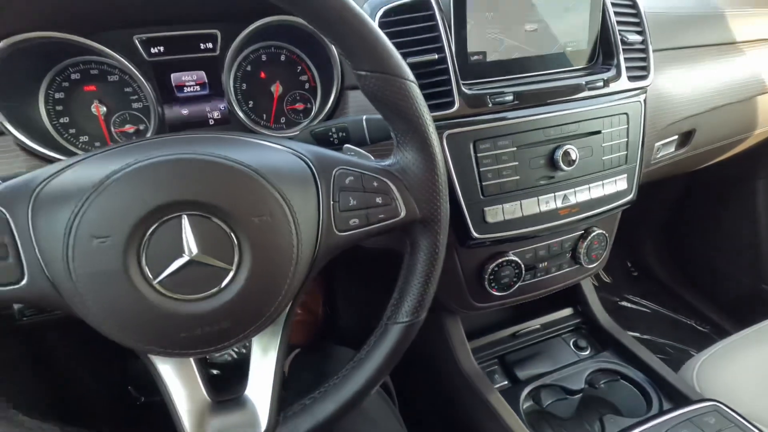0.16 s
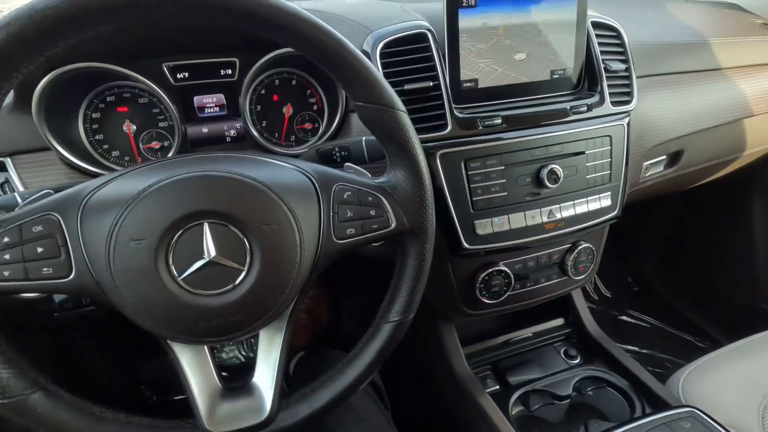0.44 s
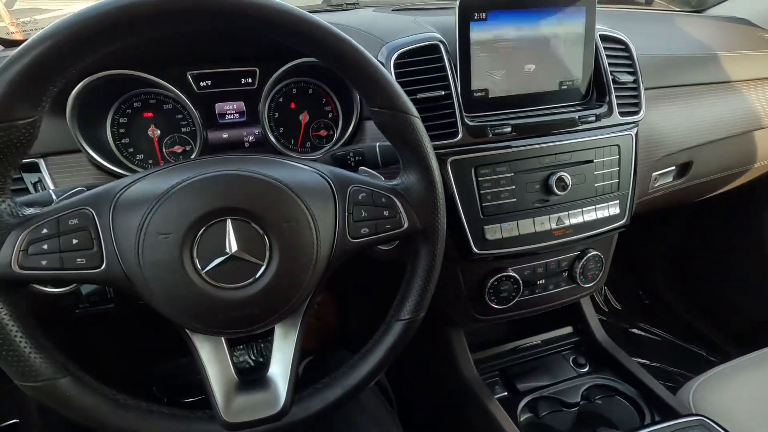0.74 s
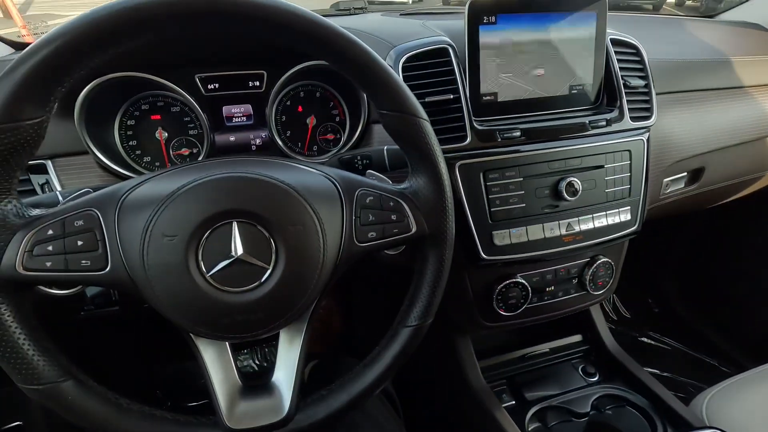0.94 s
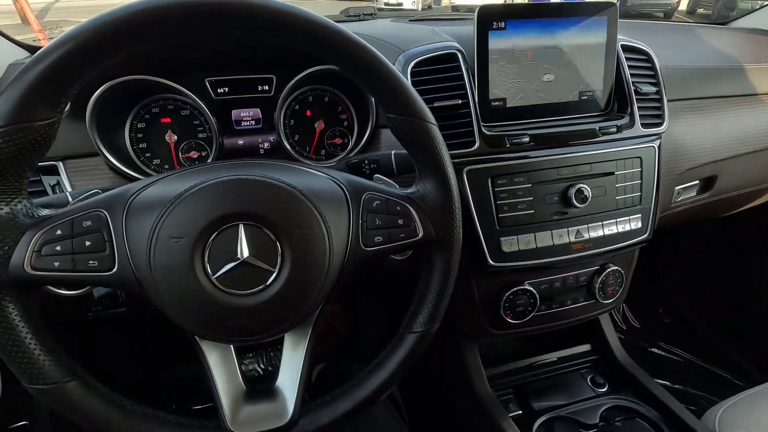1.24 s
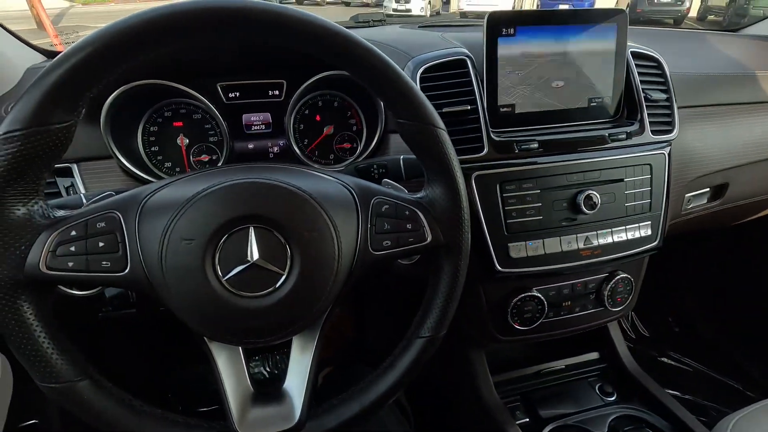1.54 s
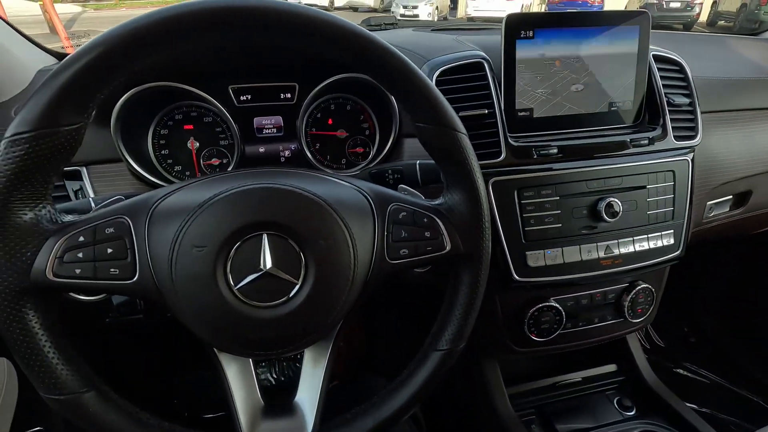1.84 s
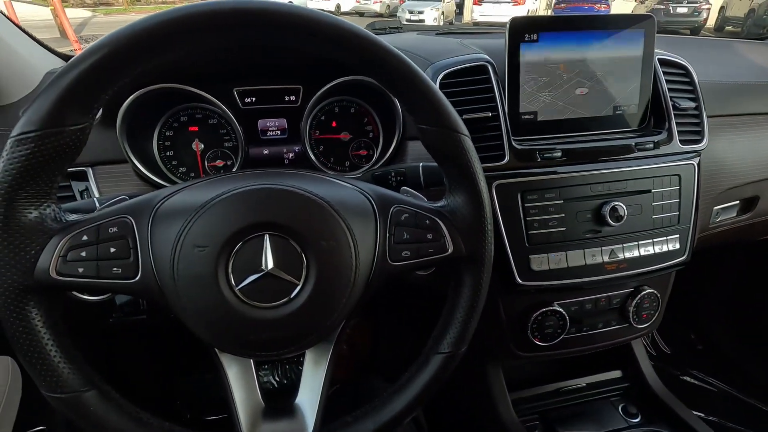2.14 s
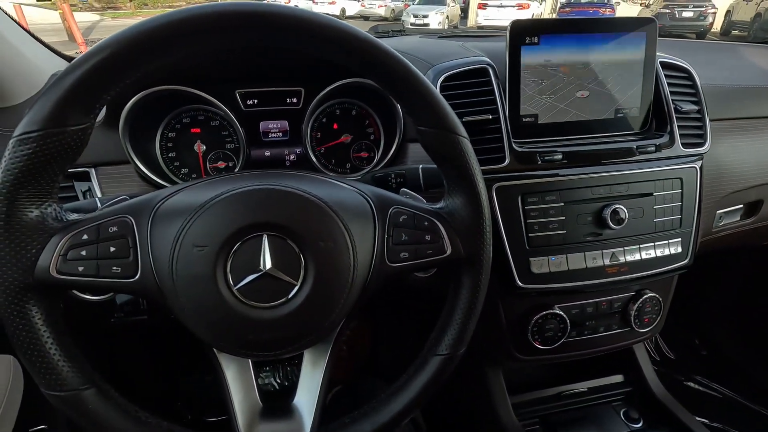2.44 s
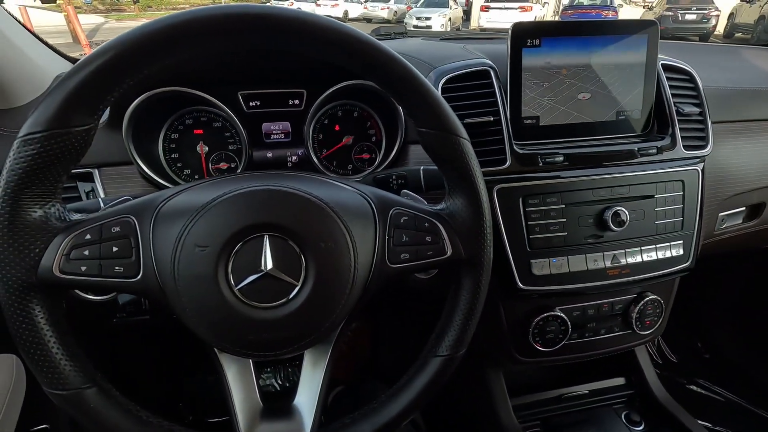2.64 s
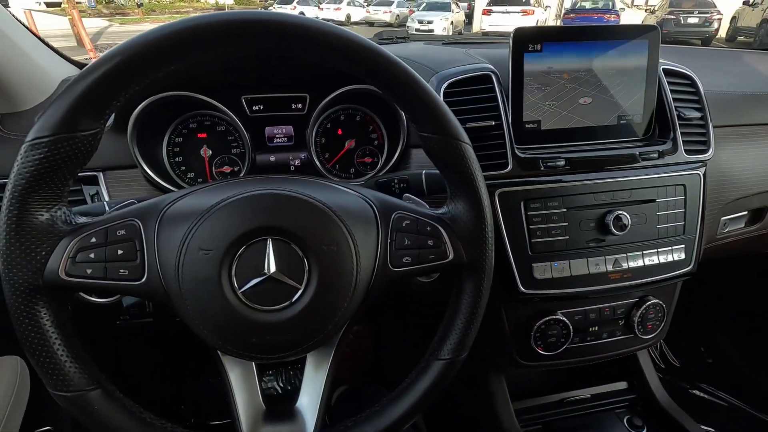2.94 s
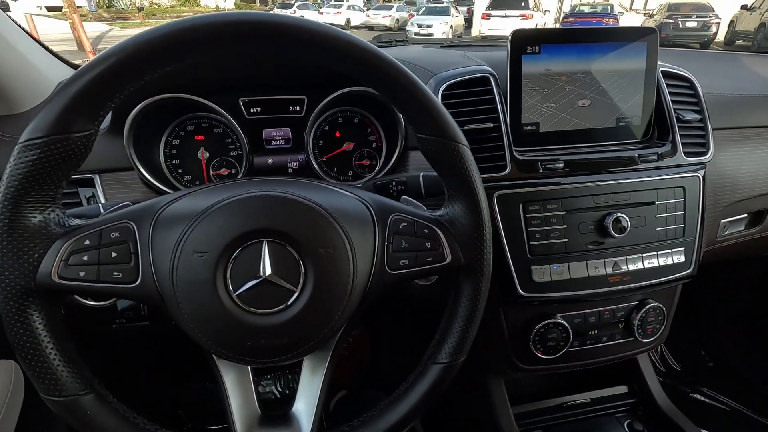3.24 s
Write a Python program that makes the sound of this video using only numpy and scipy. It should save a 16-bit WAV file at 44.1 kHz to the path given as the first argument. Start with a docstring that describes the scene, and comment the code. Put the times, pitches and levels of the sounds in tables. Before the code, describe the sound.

From the driver's seat, close microphone: low smooth engine idle, several small plastic clicks and faint rustling, then a quick throaty rev, a sinking hum and a second rev starting as it cuts off.

```python
"""Revving a parked six-cylinder

From the driver's seat, a petrol engine idles, is revved, sinks and is revved again.
Sines at multiples of the shaft speed boom in the closed cabin, over low noise.
The intake roars with noise and a gliding comb of half orders; brighter noise is valve and belt whirr.
Close by, plastic clicks (noise snaps and decaying sines) over a soft rustling hiss.
Car-body resonances, as wandering sines, swell as the revs rise and sink."""
import sys
import numpy as np
from scipy.fft import rfft, irfft, next_fast_len
from scipy.io import wavfile
from scipy.ndimage import map_coordinates

SR = 44100
rng = np.random.default_rng(int(sys.argv[2]) if len(sys.argv) > 2 else 0)


def unload_wav(signal):
    """Save mono or channel-first audio to the path in sys.argv[1] as 16-bit WAV at rate SR, clipped to [-1, 1]."""
    wavfile.write(
        sys.argv[1],
        SR,
        np.round(np.clip(np.atleast_2d(signal).T, -1, 1) * 32767).astype(np.int16),
    )


N = 149940  # samples, 3.4 s


def amp(db):
    """Decibels to a linear gain."""
    return 10 ** (np.asarray(db) / 20)


def unit(x):
    """x scaled to rms 1."""
    return x / np.sqrt(np.mean(x ** 2) + 1e-20)


def along(points, hz):
    """Read (frequency, value) points on a log-frequency axis."""
    f, v = np.transpose(points)
    return np.interp(np.log(hz + 1), np.log(f + 1), v)


def curve(rows, column=1):
    """One column of a timed table, one value per sample."""
    columns = np.transpose(rows)
    return np.interp(np.arange(N) / SR, columns[0], columns[column])


def wobble(rate):
    """A smooth random curve, rate knots a second."""
    knots = rng.standard_normal(int(N * rate / SR) + 4)
    return map_coordinates(knots, [np.arange(N) * rate / SR])


def filtered(x, response):
    """x with its spectrum multiplied by a response of frequency."""
    n = x.shape[-1]
    m = next_fast_len(n + 8192)
    spectrum = rfft(x, m) * response(np.fft.rfftfreq(m, 1 / SR))
    return irfft(spectrum, m)[..., :n]


def pan(db):
    """Left and right gains for a left-minus-right level."""
    return amp(np.array([[.5], [-.5]]) * db)


def cycles(hz):
    """Running count of cycles of a gliding frequency."""
    return np.cumsum(hz) / SR


# stereo width of the noises: (frequency [Hz], left-right likeness [0-1])
ALIKE = [(30, .98), (130, .9), (250, .5), (500, .3), (1000, .33), (4000, .35), (10000, .6)]


def noise(colour, size=N):
    """Coloured stereo noise of rms 1, nearly mono in the bass: a shared mid plus an opposed side."""
    turn = lambda hz: np.arccos(np.clip(along(ALIKE, hz), -1, 1)) / 2
    shape = lambda hz: amp(along(colour, hz)) * [np.cos(turn(hz)), np.sin(turn(hz))]
    mid, side = filtered(rng.standard_normal((2, size)), shape)
    return unit(np.array([mid + side, mid - side]))


def band(centre_hz, octaves):
    """Stereo noise of rms 1 in a bell-shaped band."""
    bell = lambda hz: np.exp(-.5 * (np.log2((hz + 1) / centre_hz) / octaves) ** 2)
    return unit(filtered(rng.standard_normal((2, N)), bell))


FIRINGS_PER_TURN = 3
FIRING_DB, FIRING_UNSTEADY_DB = 3.5, 1  # lift and flutter of the firing note
ORDER_JITTER = .012  # turns of phase wander per dB of unsteadiness
# engine load: (time [s], load [dB])
LOAD = [(0, -10), (1.1, -5.5), (1.28, -5.5), (1.44, -7), (1.65, 7), (1.86, -1.5), (2.0, -3), (2.2, -10.5),
        (2.5, -14.5), (2.8, -10), (2.95, -7.5), (3.25, 4.5), (3.4, 0)]
# the revs: (time [s], firing rate [per second], firing-note level before its lift [dB])
REVS = [(0, 29.2, -32.5), (1.1, 30.7, -31.5), (1.22, 37.2, -27), (1.3, 38.6, -24.5), (1.36, 50, -26.5),
        (1.44, 66, -19.5), (1.51, 75.7, -38.5), (1.624, 104, -28), (1.73, 126.6, -32), (1.82, 149.5, -31.5),
        (1.904, 154, -30), (2.02, 148.6, -27), (2.22, 133.3, -41), (2.45, 108, -37), (2.75, 78.4, -50.5),
        (2.93, 65.7, -40), (3.06, 78, -42), (3.15, 89, -30.5), (3.29, 117.5, -30.5), (3.4, 127, -33.5)]
# the other crankshaft orders: (multiple of shaft speed, level [dB], share of the load [0-1],
# rise [dB per doubling of speed], unsteadiness [dB])
ORDERS = [(1, -42, 0, 3.5, 6.5), (1.5, -40.5, 0, 1.5, 5), (2, -47, 0.06, 8, 3.9), (2.5, -50.5, 1, 0, 7.5),
          (4, -53, 0.8, 1.5, 5.5), (4.5, -50.5, 0, 0, 8.5), (6, -23, 0.95, -10.5, 1.5),
          (9, -42.5, 0.6, 1, 5)]
# how the cabin passes the orders: (frequency [Hz], gain [dB])
CABIN = [(12, -24), (23, -10), (31, -4), (37, 6.5), (47, 3), (62, -1.5), (80, -7), (105, 2.5), (130, -10),
         (153, 0), (190, -3), (235, -17.5), (285, -13.5), (500, -14), (900, -44)]


def boom(firing_hz, octaves):
    """The firing note, and weaker shaft orders shaped by load, speed and the cabin resonances they cross."""
    shaft_hz = firing_hz / FIRINGS_PER_TURN
    turns, load_db = cycles(shaft_hz), curve(LOAD)
    firing_db = curve(REVS, column=2) + FIRING_DB + FIRING_UNSTEADY_DB * wobble(20)
    out = -amp(firing_db) * np.cos(2 * np.pi * FIRINGS_PER_TURN * turns)
    for multiple, db, share, rise_db, unsteady_db in ORDERS:
        level = db + share * load_db + rise_db * octaves
        level = level + along(CABIN, multiple * shaft_hz) + unsteady_db * wobble(13)
        jitter = ORDER_JITTER * unsteady_db * wobble(11)
        out -= amp(level) * np.cos(2 * np.pi * (multiple * turns + jitter))
    return out


RUMBLE_DB, RUMBLE_DB_PER_OCTAVE, RUMBLE_LOAD_SHARE = -38, 1.5, 0.25
# tone of the rumble: (frequency [Hz], level [dB])
RUMBLE_COLOUR = [(12, -21), (22, -2), (38, 3), (55, -11), (75, -4), (100, -3), (130, -6.5), (160, -7),
                 (200, -14), (260, -26.5), (400, -83)]


def rumble(octaves):
    """Low noise that follows speed and, in part, load."""
    level = RUMBLE_DB + RUMBLE_DB_PER_OCTAVE * octaves + RUMBLE_LOAD_SHARE * curve(LOAD)
    return amp(level) * noise(RUMBLE_COLOUR)


# resonances of the intake: (frequency [Hz], level [dB])
ROAR_COLOUR = [(130, -17.5), (200, -5), (235, -7.5), (283, 2), (330, -2), (400, 0), (440, -4.5),
               (500, -0.5), (550, -10), (690, -9.5), (830, -18.5), (930, -25), (1100, -24.5), (1800, -71)]


def intake_comb(shaft_hz, count=40):
    """Unequal cylinders give a comb of half orders, which glides through the intake's resonances."""
    turns, out = cycles(shaft_hz), np.zeros((2, N))
    for order in np.arange(count) / 2 + FIRINGS_PER_TURN:
        phase = rng.uniform(0, 2 * np.pi) + rng.standard_normal((2, 1)) + .5 * wobble(10)
        level = along(ROAR_COLOUR, order * shaft_hz) + 3.6 * wobble(20)
        out += amp(level) * np.cos(2 * np.pi * order * turns + phase)
    return unit(out)


ROAR_DB, ROAR_TONE_DB = 3.5, -1  # lift of the roar; comb against the rush of air
ROAR_PULSING, CYLINDER_UNEVEN = 0.095, 0.24  # depth of the firing beat and of the once-a-turn throb
# the intake roar: (time [s], level before its lift [dB])
ROAR = [(0, -57.5), (.6, -56.5), (1.0, -60), (1.38, -59), (1.52, -50.5), (1.66, -44), (1.86, -38.5),
        (1.92, -47), (2.05, -50), (2.2, -52), (2.36, -52.5), (2.62, -58), (2.85, -60.5), (3.03, -54.5),
        (3.12, -50.5), (3.3, -44), (3.4, -46.5)]


def roar(firing_hz):
    """Rushing air that beats with the firings and throbs once a turn, blended with the intake comb."""
    shaft_hz = firing_hz / FIRINGS_PER_TURN
    beat = np.cos(2 * np.pi * cycles(firing_hz))
    throb = np.cos(2 * np.pi * cycles(shaft_hz))
    rush = noise(ROAR_COLOUR) * (1 + ROAR_PULSING * beat + CYLINDER_UNEVEN * throb)
    return amp(curve(ROAR) + ROAR_DB) * unit(rush + amp(ROAR_TONE_DB) * intake_comb(shaft_hz))


WHIRR_DB, WHIRR_PULSING = 2, 0.12  # lift; depth of the firing beat
# valve and belt noise: (time [s], level before its lift [dB])
WHIRR = [(0, -66), (.68, -69), (1.05, -71.5), (1.35, -70.5), (1.6, -65), (1.82, -57.5), (1.94, -63),
         (2.07, -58), (2.17, -62), (2.6, -66), (3.08, -66), (3.4, -59.5)]
# tone of the valves and belt: (frequency [Hz], level [dB])
WHIRR_COLOUR = [(450, -25), (800, -8.5), (930, -0.5), (1100, 1), (1300, 2), (1700, -4.5), (1900, -3),
                (2300, -16.5), (2850, -12.5), (3400, -30.5), (5000, -43.5)]


def whirr(firing_hz):
    """Valve and belt noise, pulsing lightly with the firings."""
    beat = np.cos(2 * np.pi * cycles(firing_hz))
    return amp(curve(WHIRR) + WHIRR_DB) * unit(noise(WHIRR_COLOUR) * (1 + WHIRR_PULSING * beat))


def engine():
    """Every engine layer driven by one slightly unsteady firing rate."""
    firing_hz = curve(REVS) * (1 + 0.0044 * wobble(9))
    octaves = np.log2(firing_hz / firing_hz[0])  # speed above the opening idle
    return boom(firing_hz, octaves) + rumble(octaves) + roar(firing_hz) + whirr(firing_hz)


HISS_DB = 1  # lift of the hiss
# the treble hiss: (time [s], level before its lift [dB])
HISS = [(0.0, -63), (0.15, -68), (0.23, -73.5), (0.57, -71), (0.78, -77), (0.94, -80.5), (1.22, -80.5),
        (1.44, -80), (1.66, -75), (1.8, -70), (2.01, -69), (2.11, -64.5), (2.32, -72), (3.14, -76.5),
        (3.38, -69)]
# tone of the hiss: (frequency [Hz], level [dB])
HISS_COLOUR = [(900, -15), (2000, 2), (3000, 0.5), (4000, -4), (5200, -4.5), (6800, -6), (7900, -9),
               (8600, -20.5), (11000, -19), (13500, -32)]
# soft brushes: (peak time [s], bell length, one sigma [s], level [dB], centre [Hz], bell width [octaves])
SWISHES = [(0.202, 0.075, -69.5, 5500, 0.62), (1.293, 0.036, -72, 6370, 0.2),
           (1.838, 0.024, -70, 6680, 0.21), (2.057, 0.042, -70, 6400, 0.73),
           (2.231, 0.024, -70.5, 5190, 0.46), (2.651, 0.04, -73, 6700, 0.22),
           (2.87, 0.055, -74, 6500, 0.23), (3.39, 0.035, -69, 6590, 0.41)]


def rustle():
    """A faint, grainy hiss with a few brushing swells of band noise."""
    t = np.arange(N) / SR
    out = amp(curve(HISS) + HISS_DB + 1.2 * wobble(70)) * noise(HISS_COLOUR)
    for peak, length, db, centre_hz, width in SWISHES:
        swell = np.exp(-.5 * ((t - peak) / length) ** 2)
        out += amp(db) * swell * band(centre_hz, width)
    return out


SNAP_RISE_S, SNAP_T60 = 0.00064, 0.011  # seconds
CABIN_T60, CABIN_DB = 0.15, -25.5  # cabin tail [s], level against the snap [dB]
KNOCK_PAN_DB = -10  # left minus right
SKEW = 1  # radians, added on the left and taken off on the right
# plastic clicks: (time [s], snap level [dB], ring over the snap [dB], clack level [dB], clack pitch [Hz],
# clack t60 [s], knock level [dB], knock pitch [Hz], brightness [dB per octave], left minus right [dB])
CLICKS = [(0.2309, -37.5, 5, -29, 1000, .005, -23.5, 299, -8, 4.5),
          (0.3907, -46, 3, -34, 1090, .007, -29.5, 264, -6.5, 4.5),
          (0.4632, -32, -3, -21, 750, 0.0039, -23, 183, 0, 5),
          (0.581, -34.5, 8.5, -42, 1200, 0.0056, -31.5, 321, -5, 6),
          (.738, -60.5, -8, -34, 1397, 0.0075, -62, 388, -13, 5),
          (1.631, -35, 4, -42, 1280, .03, -36.5, 301, -5, -4.5),
          (1.6386, -30, 7.5, -36, 1284, 0.077, -33, 413, 1, 4.5),
          (1.798, -42, -21, -48.5, 5960, 0.022, -63, 302, 10.5, 3.5)]
# tone of the snap: (frequency [Hz], level [dB])
SNAP_COLOUR = [(500, -29.5), (1000, -0.5), (1280, 3.5), (1600, -7.5), (2050, 0.5), (2500, -4.5),
               (3200, 0.5), (3900, -0.5), (4300, -5), (6300, -7), (8000, -11), (9500, -26), (13000, -30)]
# ringing modes of the plastic: (frequency [Hz], level before the click's ring setting [dB], t60 [s])
TRIM = [(2000, -22, 0.032), (3280, -20, 0.02), (3855, -11, 0.027), (6120, -20, 0.015)]
# modes of the knock: (multiple of the knock pitch, level against the knock setting [dB], t60 [s])
KNOCK_MODES = [(.65, -12, 0.069), (1, 1.5, 0.05), (1.4, 1, 0.022), (1.9, -5.5, 0.027), (2.7, -13.5, 0.018),
               (3.8, -13.5, 0.027)]


def clicks():
    """Each click is a short snap with a brief cabin tail, a ring of the plastic, a hollow clack and a dull knock."""
    out, t = np.zeros((2, N + SR)), np.arange(SR // 6) / SR
    fade = lambda t60: amp(-60 * t / t60)
    skew = SKEW * np.array([[1], [-1]])
    rise = 1 - np.exp(-t / SNAP_RISE_S)
    for (start, snap_db, ring_db, clack_db, clack_hz, clack_t60,
         knock_db, knock_hz, bright_db, side_db) in CLICKS:
        snap = noise(SNAP_COLOUR, size=len(t)) * (fade(SNAP_T60) + amp(CABIN_DB) * fade(CABIN_T60))
        ring = np.zeros((2, len(t)))
        for hz, db, t60 in TRIM:
            phase = rng.normal(0, 1.0, (2, 1))
            ring += amp(db + ring_db) * fade(t60) * np.sin(2 * np.pi * hz * t + phase)
        # brightness tilts the snap and ring around 3.5 kHz
        tilt = lambda hz: amp(bright_db * np.log2(np.clip(hz, 1000, 10000) / 3500))
        top = filtered((snap + ring) * rise, tilt)
        clack = amp(clack_db) * fade(clack_t60) * np.sin(2 * np.pi * clack_hz * t + skew)
        knock = np.zeros((2, len(t)))
        for i, (multiple, db, t60) in enumerate(KNOCK_MODES):
            phase = i * np.pi + skew  # neighbouring modes start in opposite phase
            knock += amp(db) * fade(t60) * np.sin(2 * np.pi * multiple * knock_hz * t + phase)
        low = (amp(knock_db) * pan(KNOCK_PAN_DB) * knock + clack) * rise
        out[:, round(start * SR):][:, :len(t)] += amp(snap_db) * pan(side_db) * top + low
    return out[:, :N]


DRONE_UNSTEADY_DB = 1.6
# car-body resonances the engine shakes: (pitch [Hz], pitch wander [Hz], start [s], loudest [s], end [s],
# level [dB])
DRONES = [(151.4, 1.7, 1.42, 1.5, 1.59, -34), (42, 1.8, 1.4, 1.63, 1.69, -23.5),
          (22.9, 1.19, 1.88, 2, 2.62, -20), (41.18, 1.92, 2.02, 2.56, 2.57, -22.5),
          (35.83, 0.72, 2.58, 2.97, 3.348, -18.5), (151, 2, 2.93, 3.03, 3.11, -35),
          (283, 8, 2.98, 3.366, 3.6, -39)]


def drones():
    """As the revs rise and sink, body resonances swell and fade as wandering sines."""
    t, out = np.arange(N) / SR, np.zeros(N)
    for hz, wander_hz, start, loudest, end, db in DRONES:
        swell = np.interp(t, [start, loudest, end], [0, 1, 0])
        level = amp(db + DRONE_UNSTEADY_DB * wobble(9.873))
        out += swell * level * np.sin(2 * np.pi * cycles(hz + wander_hz * wobble(13)))
    return out


# stereo lean of the cabin sound: (frequency [Hz], left minus right [dB])
LEAN = [(60, 0.3), (130, -0.5), (280, 0.5), (900, 0), (2000, 1), (8000, 2.5)]


def scene():
    """Engine, body and rustle fill the cabin; the clicks are close by."""
    cabin = engine() + drones() + rustle()
    return filtered(cabin, lambda hz: pan(along(LEAN, hz))) + clicks()


TOP_HZ = 13600


def record(dry):
    """A sharp band limit keeps only what lies below TOP_HZ."""
    return filtered(dry, lambda hz: hz < TOP_HZ)


dry = scene()
out = record(dry)
unload_wav(out)
```